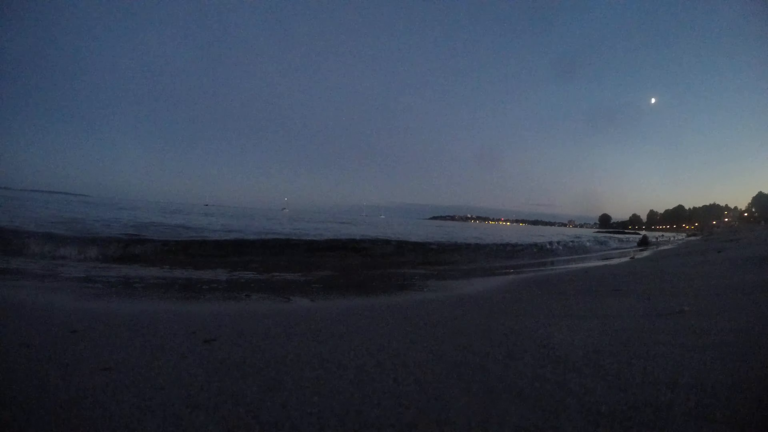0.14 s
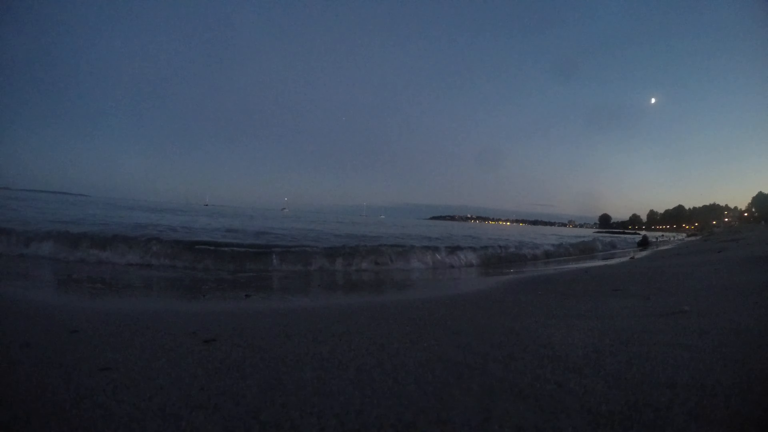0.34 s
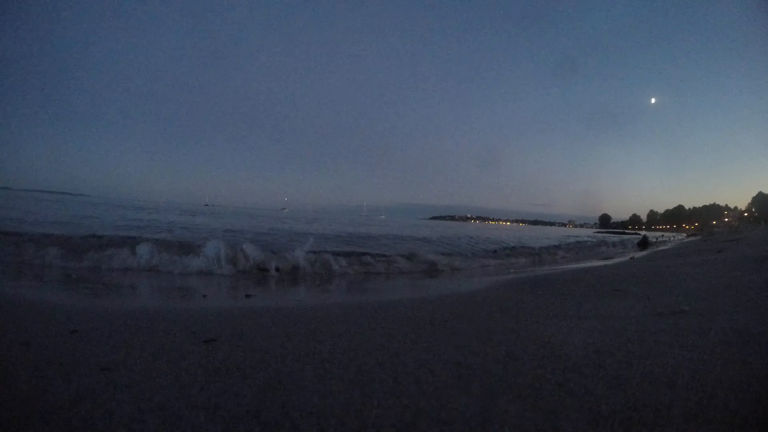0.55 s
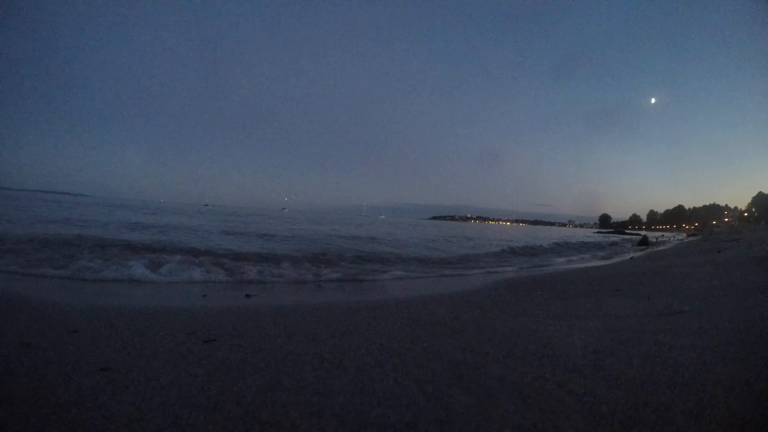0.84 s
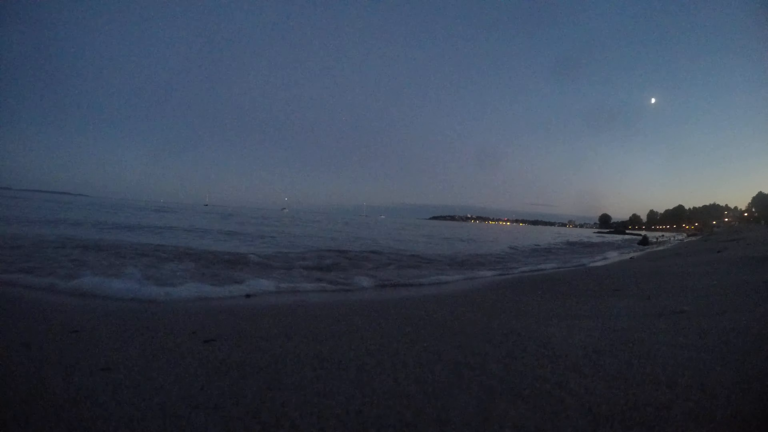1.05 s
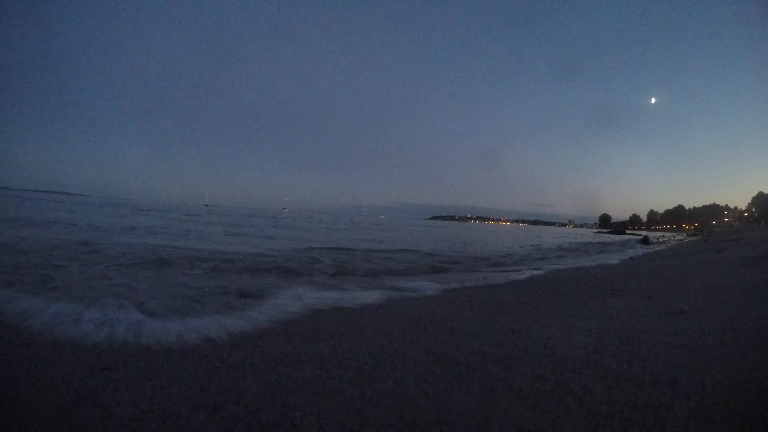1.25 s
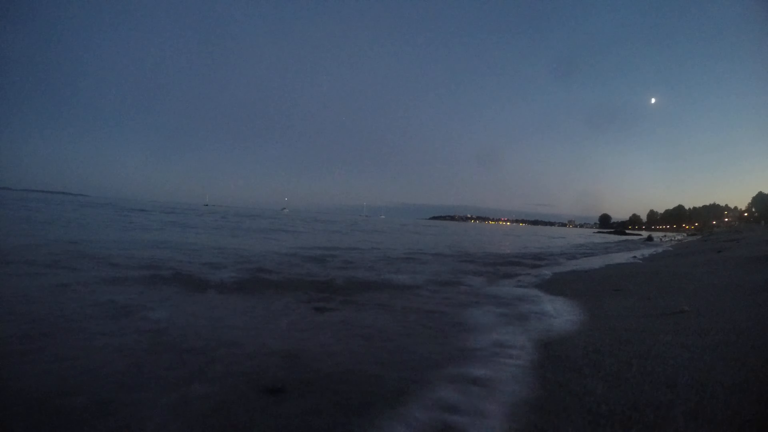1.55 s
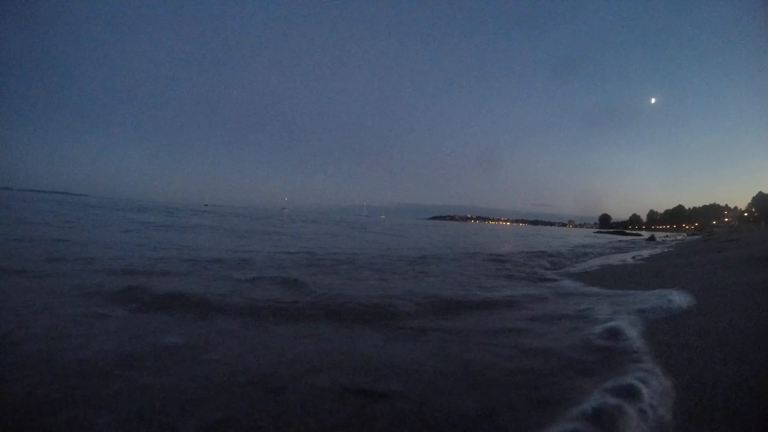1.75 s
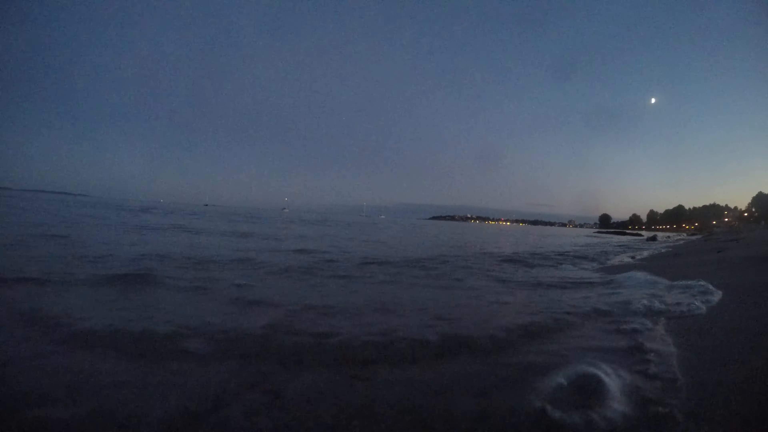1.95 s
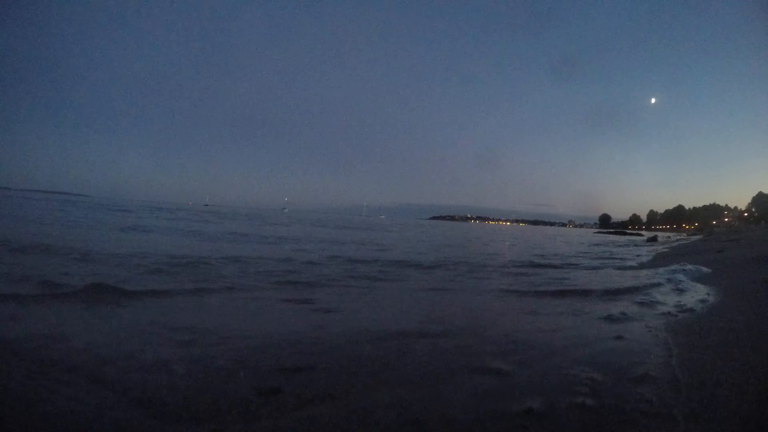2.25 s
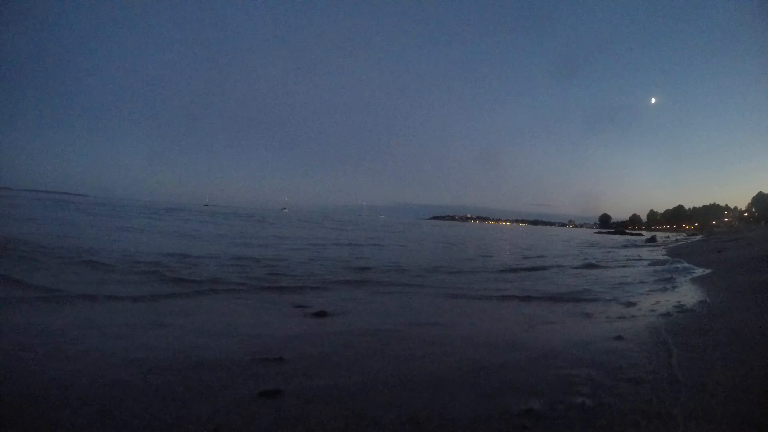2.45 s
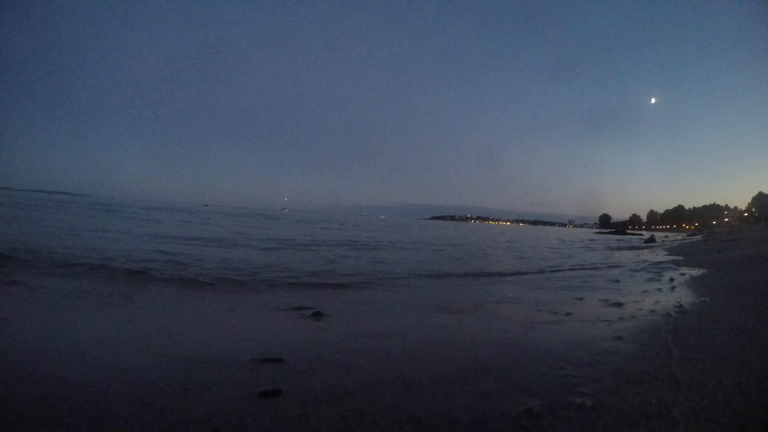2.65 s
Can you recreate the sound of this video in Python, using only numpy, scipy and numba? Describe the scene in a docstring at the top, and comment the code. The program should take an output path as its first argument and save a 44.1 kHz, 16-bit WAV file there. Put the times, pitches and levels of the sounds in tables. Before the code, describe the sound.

Small sea wave spilling with hollow gulps, then bubbling foam running up close over sand

```python
"""A sandy beach on a still night: a small wave spills over, collapses on trapped air and runs up the sand.
Clouds of ringing bubbles, each a decaying sine, make the break, the fizzing swash and the trickling backwash.
Single drops and bursting bubbles sound close by as short clicks and chirps; trapped air booms as gliding sines.
Filtered noise gives a low rumble of air on the microphone and the faint hiss of a calm sea."""
import sys
import numpy as np
from scipy import signal
from scipy.fft import rfft, irfft, next_fast_len
from scipy.io import wavfile
from scipy.ndimage import uniform_filter1d
from numba import njit

SR = 44100
rng = np.random.default_rng(int(sys.argv[2]) if len(sys.argv) > 2 else 0)


def digitize_waveform(pressure):
    """Quantize a signal to 16-bit integers and store it at the path in sys.argv[1].

    Rows of a 2-D input are taken as channels; values are limited to [-1, 1].
    """
    field = np.atleast_2d(pressure).T
    bounded = np.clip(field, -1, 1)
    quanta = np.round(bounded * 32767).astype(np.int16)
    wavfile.write(sys.argv[1], SR, quanta)


N = 123921
T = np.arange(N) / SR


def undb(db):
    """Level definition: decibels to amplitude gain."""
    return 10 ** (np.asarray(db) / 20)


def curve(rows):
    """Level envelope: gain over time, interpolated in decibels between (time_s, level_db) points."""
    time_s, level_db = np.array(rows).T
    return undb(np.interp(T, time_s, level_db))


def colour(x, points):
    """Minimum-phase filtering: a causal filter through (frequency_hz, density_db) points, output rms 1."""
    hz, db = np.array(points).T
    size = next_fast_len(2 * N)
    f = np.maximum(np.arange(size // 2 + 1) * SR / size, 1)
    # beyond the end points the response falls 20 dB per octave
    octaves_below = np.maximum(np.log2(hz[0] / f), 0)
    octaves_above = np.maximum(np.log2(f / hz[-1]), 0)
    response_db = np.interp(np.log(f), np.log(hz), db) - 20 * (octaves_below + octaves_above)
    # folding the cepstrum onto positive time makes the filter causal
    cepstrum = irfft(np.log(undb(response_db)), size)
    cepstrum[1:size // 2] *= 2
    cepstrum[size // 2 + 1:] = 0
    y = irfft(rfft(x, size) * np.exp(rfft(cepstrum)), size)[:N]
    return y / y.std()


def walk(rate):
    """Band-limited fluctuation: random steps, rate per second, smoothed twice; spread near 1."""
    hold = max(int(SR / rate), 2)
    steps = np.repeat(rng.standard_normal(N // hold + 1), hold)
    return 1.3 * uniform_filter1d(uniform_filter1d(steps, hold), hold)[:N]


def burst(start, swell, decay):
    """Transient envelope: a smooth sine-squared swell, then exponential decay (all in s)."""
    age = np.maximum(T - start, 0)
    rise = np.sin(np.pi / 2 * np.minimum(age / swell, 1)) ** 2
    return rise * np.exp(-np.maximum(age - swell, 0) / decay)


def bubble(start, hz, swell, decay, glide):
    """Volume resonance: one body of air rings while its pitch slides (glide in octaves per s)."""
    age = np.maximum(T - start, 0)
    pitch = hz * 2 ** (glide * np.minimum(age, swell + 2 * decay))
    return burst(start, swell, decay) * np.sin(2 * np.pi * np.cumsum(pitch * (age > 0)) / SR)


@njit
def ring(starts, hz, cycles, sizes, rise):
    """Superposition of damped oscillators: small bubbles, each a fading sine that rises in pitch."""
    out = np.zeros(N)
    for k in range(len(starts)):
        length, first, phase = cycles[k] * SR / hz[k], int(starts[k]), 0.
        for i in range(min(int(length), N - first)):
            u = i / length
            phase += 2 * np.pi * hz[k] * (1 + rise * u) / SR
            out[first + i] += sizes[k] * np.exp(-5 * u) * np.sin(phase)
    return out


def cloud(points, lo_hz, hi_hz, cycles, spread_db, rise, blur, count):
    """Random superposition: bubbles of many sizes over the noise blur of those too small to tell apart."""
    when, pitch, life, size = rng.random((count, 4)).T
    hz = lo_hz * (hi_hz / lo_hz) ** pitch
    sizes = hz * undb(-spread_db * np.log(1 - .985 * size))
    lives = cycles * 2 ** (2 * life - 1)  # half to twice the given cycles
    grains = ring(when * N, hz, lives, sizes, float(rise))
    return colour(grains / grains.std() + blur * rng.standard_normal(N), points)


# spectrum of the calm sea: frequency_hz, density_db (per Hz)
SEA_SPECTRUM = [(200, 3), (800, 4), (1100, 3), (2400, -12), (3300, -1.5), (5000, -8.5), (8000, -4.5),
                (13000, -9.5), (15500, -13)]
SEA_DB = -67


def sea():
    """Broadband noise: the faint, slowly wavering hiss of the calm water along the shore."""
    hiss = colour(rng.standard_normal(N), SEA_SPECTRUM)
    return undb(SEA_DB + .5 * walk(4.6)) * hiss


# spectrum of air on the microphone: frequency_hz, density_db (per Hz)
RUMBLE_SPECTRUM = [(15, -2), (28, -5), (45, 2.5), (70, -3), (105, -6), (135, -13.5), (190, -17), (260, -17),
                   (340, -24), (1000, -43), (4000, -85)]
RUMBLE_DB = -49.5


def rumble():
    """Low-frequency noise: air rumbles steadily on the microphone."""
    return undb(RUMBLE_DB) * colour(rng.standard_normal(N), RUMBLE_SPECTRUM)


# spectrum of big bubbles, also of the thump's slosh: frequency_hz, density_db (per Hz)
CHURN_SPECTRUM = [(50, -18), (90, -6), (170, -4), (280, -7), (380, -9), (520, -16.5), (800, -18)]
THUMP_S, THUMP_HZ, THUMP_WIDTH_S = 1.985, 63.5, 0.0024
THUMP_DB, THUMP_SLOSH_DB = -30.5, -52


def thump():
    """Impulsive displacement: one dull pulse with a sloshing noise tail as the water arrives."""
    age = T - THUMP_S
    pulse = -np.cos(2 * np.pi * THUMP_HZ * age) / np.cosh(age / THUMP_WIDTH_S)
    slosh_envelope = burst(THUMP_S - THUMP_WIDTH_S, THUMP_WIDTH_S, 0.02)
    slosh = colour(rng.standard_normal(N), CHURN_SPECTRUM) * slosh_envelope
    return undb(THUMP_DB) * pulse + undb(THUMP_SLOSH_DB) * slosh


# spectrum of a dry tick: frequency_hz, density_db (per Hz)
TICK_SPECTRUM = [(1200, -6), (2200, -2.5), (4200, 2.5), (6500, -8), (15000, -22.5)]
DROP_SWELL_S, TICK_DECAY_S = 0.00055, 0.002
TICK_SCATTER_OCT, SPLATTER_DB = 0.1, -11.5  # pitch scatter of the snap; splatter rms re snap peak


def ticks(starts, levels_db):
    """Impulse response: each tick is a snap, higher or lower with bubble size, and its wet splatter."""
    snap = colour(signal.unit_impulse(N), TICK_SPECTRUM)
    snap = snap / np.abs(snap).max()
    splatter = undb(SPLATTER_DB) * colour(rng.standard_normal(N), TICK_SPECTRUM)
    out = np.zeros(N)
    for start, db in zip(starts, levels_db):
        age = (T - start) * 2 ** (TICK_SCATTER_OCT * rng.standard_normal())
        tick = np.interp(age, T, snap, left=0) + splatter * burst(start, DROP_SWELL_S, TICK_DECAY_S)
        out += undb(db) * tick
    return out


# foam bubbles that burst: start_s, level_db (peak of the snap)
POP_EVENTS = [(1.4104, -40.5), (1.5417, -37), (1.5604, -38), (1.6852, -44), (1.7162, -41), (1.7265, -42),
              (1.7499, -39), (1.7593, -37), (1.764, -40), (1.7953, -41), (1.826, -38), (1.8281, -40.5),
              (1.9163, -40), (1.9485, -37.5), (2.139, -39.5), (2.226, -47.5), (2.308, -41.5), (2.3367, -46),
              (2.3485, -43.5), (2.3733, -45), (2.38, -45.5), (2.3963, -47.5), (2.5061, -43)]


def pops():
    """Sudden pressure release: foam bubbles burst with a dry tick."""
    start_s, level_db = np.array(POP_EVENTS).T
    return ticks(start_s, level_db)


# near drops that leave a ringing bubble: start_s, pitch_hz (at the start), level_db (of the ringing), decay_s
DROP_EVENTS = [(.292, 2690, -38, 0.0028), (.623, 10000, -43.5, .001), (.6677, 2580, -33.5, 0.0031),
               (.7285, 12200, -50, 0.00092), (1.3547, 1220, -40, 0.0015), (1.356, 2540, -42, 0.0025),
               (1.4102, 2280, -46, 0.0026), (1.428, 4700, -44.5, .0015), (1.534, 5860, -36.5, 0.0012),
               (1.534, 2300, -39.5, 0.0033), (1.5615, 4340, -30.5, 0.0013), (1.5722, 5600, -42, .0007),
               (1.657, 2250, -39, 0.0016), (1.683, 2800, -42.5, 0.0021), (2.0108, 3700, -38, 0.00045),
               (2.078, 2230, -45, 0.0051), (2.1353, 2940, -43, 0.00084)]
DROP_GLIDE, DROP_TICK_DB = 4.7, -8  # octaves per s; tick re ringing bubble


def drops():
    """Impact and resonance: near drops tick and leave a bubble that rings upward in pitch."""
    ringing = sum(undb(db) * bubble(start, hz, DROP_SWELL_S, decay, DROP_GLIDE)
                  for start, hz, db, decay in DROP_EVENTS)
    start_s, _, level_db, _ = np.array(DROP_EVENTS).T
    return ringing + ticks(start_s, level_db + DROP_TICK_DB)


# spray from the crest and the foam front: start_s, level_db, swell_s, decay_s
SPRAY_EVENTS = [(.33, -51, 0.058, 0.046), (.349, -47, .003, 0.009), (1.520, -43.5, 0.0083, 0.018),
                (1.556, -43.5, 0.0042, 0.0033)]
# spectrum of the spray: frequency_hz, density_db (per Hz)
SPRAY_SPECTRUM = [(900, -25), (1700, -3), (2300, 3), (3200, -1), (4400, 6.5), (6100, 1), (7500, -3),
                  (9800, -8.5), (15500, -17)]


def spray():
    """Gated bubble cloud: crest and foam front throw up brief, bright spray."""
    droplets = cloud(SPRAY_SPECTRUM, 1560, 10100, cycles=8, spread_db=3.5, rise=0.095, blur=0.16, count=14000)
    return droplets * sum(undb(db) * burst(start, swell, decay) for start, db, swell, decay in SPRAY_EVENTS)


# fine droplets pattering down: time_s, level_db
PATTER_LEVEL = [(0, -91), (.3, -59.5), (.7, -70.5), (1.1, -73), (1.45, -71), (1.78, -60.5), (2.0, -65),
                (2.2, -71), (2.8, -74)]
# their spectrum: frequency_hz, density_db (per Hz)
PATTER_SPECTRUM = [(1500, -15), (2400, 8), (3300, 2.5), (4600, 2), (7500, -2.5), (10200, -3), (13000, -5.5),
                   (15500, -14)]


def patter():
    """Random short resonances: fine droplets patter down at fixed pitches."""
    droplets = cloud(PATTER_SPECTRUM, 3100, 16200, cycles=5, spread_db=2.7, rise=0, blur=0.4, count=1100)
    return droplets * curve(PATTER_LEVEL)


# foam front running up the sand, and water gurgling and draining, before flutter: time_s, level_db
FIZZ_LEVEL = [(0, -84), (.8, -67), (1.15, -66.5), (1.42, -61), (1.52, -55), (1.62, -56.5), (1.8, -58),
              (1.95, -57), (2.06, -65), (2.35, -71), (2.8, -72)]
GURGLE_LEVEL = [(0, -79), (.8, -59), (1.4, -66), (1.76, -59.5), (1.94, -55), (2.07, -61), (2.2, -63.5),
                (2.42, -64), (2.6, -70), (2.8, -68)]
# spectra of both: frequency_hz, density_db (per Hz)
FIZZ_SPECTRUM = [(500, -24), (1050, -9.5), (1400, 0.5), (2300, 1), (2800, -3.5), (3250, -10.5), (3900, -1),
                 (4650, 4), (5500, -4), (6200, -3.5), (7500, -10.5), (15500, -21)]
GURGLE_SPECTRUM = [(150, 5.5), (280, -1), (500, -1.5), (800, 0), (1050, -3), (1400, -3.5), (2200, -0.5),
                   (3300, -14), (6000, -37)]
FLUTTER_DB = .8


def swash():
    """Bubble size sets pitch: foam fizzes up the sand, the sheet of water behind gurgles and drains."""
    fizz = cloud(FIZZ_SPECTRUM, 936, 14200, cycles=13, spread_db=2.5, rise=0.088, blur=.2, count=7000)
    gurgle = cloud(GURGLE_SPECTRUM, 252, 3930, cycles=7.7, spread_db=3, rise=0.3, blur=0.17, count=2800)
    flutter = undb(FLUTTER_DB * walk(54.8))  # shared by both
    return (fizz * curve(FIZZ_LEVEL) + gurgle * curve(GURGLE_LEVEL)) * flutter


# pockets of air trapped by the curl, before tearing:
# start_s, pitch_hz (at the start), level_db, swell_s, decay_s, glide_octaves_per_s
POCKET_EVENTS = [(.236, 253.3, -48, 0.012, 0.042, 1.5), (.347, 351, -36.5, 0.007, 0.0096, -8),
                 (0.364, 234, -38.5, 0.011, 0.0093, 1), (0.388, 130, -39.5, 0.022, 0.015, 6.5),
                 (.428, 172, -39, 0.0065, 0.032, 2), (.487, 241, -38.5, 0.015, .02, 5.5),
                 (.578, 171, -40.5, 0.019, 0.016, 1), (.588, 270, -41, .018, 0.013, 2),
                 (0.613, 234.8, -26, 0.022, 0.011, 5), (0.672, 84, -40.5, 0.016, 0.035, 3.5)]
POCKET_TEAR_DB = 1.3


def pockets():
    """Resonance of trapped air: large pockets boom with gliding pitch and a torn, flickering level."""
    boom = sum(undb(db) * bubble(start, hz, swell, decay, glide)
               for start, hz, db, swell, decay, glide in POCKET_EVENTS)
    return boom * undb(POCKET_TEAR_DB * walk(150))


# spectrum of the lip landing: frequency_hz, density_db (per Hz)
PLUNGE_SPECTRUM = [(200, -8), (320, 2.5), (520, -1.5), (820, 4), (1030, -12.5), (1250, -16), (2000, -14)]
PLUNGE_S, PLUNGE_SWELL_S, PLUNGE_DECAY_S, PLUNGE_DB = 0.464, 0.22, 0.035, -46.5


def plunge():
    """Gated bubble cloud: the lip lands in a swell of mid-sized bubbles and dies quickly."""
    bubbles = cloud(PLUNGE_SPECTRUM, 256, 2000, cycles=6.9, spread_db=-1.5, rise=.15, blur=0.32, count=5000)
    return bubbles * undb(PLUNGE_DB) * burst(PLUNGE_S, PLUNGE_SWELL_S, PLUNGE_DECAY_S)


# big bubbles churning under the crest: time_s, level_db
CHURN_LEVEL = [(0, -102), (.33, -65), (.39, -46.5), (.5, -46.5), (.64, -44.5), (.72, -50.5), (.8, -53),
               (1, -67), (2.8, -82)]


def churn():
    """Low resonance of large volumes: big bubbles churn under the crest."""
    bubbles = cloud(CHURN_SPECTRUM, 72, 820, cycles=8, spread_db=1.5, rise=0.24, blur=.25, count=1500)
    return bubbles * curve(CHURN_LEVEL)


# breaking crest and the foam it leaves, before graininess: time_s, level_db
RUSH_LEVEL = [(0, -67.5), (.1, -64), (.22, -54.5), (.32, -51), (.36, -46), (.46, -46.5), (.58, -45),
              (.67, -46.5), (.76, -53), (.95, -56.5), (1.3, -61), (2.8, -70)]
# its spectrum: frequency_hz, density_db (per Hz)
RUSH_SPECTRUM = [(280, -17), (420, -3.5), (830, -3.5), (1030, -11.5), (1190, -2.5), (1400, -6.5),
                 (2050, -1), (2650, -1.5), (3000, -5), (3400, -12.5), (4200, -8), (4700, -6), (5400, -7.5),
                 (7100, -14), (7910, -21.5), (10200, -20.5), (11800, -27), (12900, -21), (15500, -35)]
RUSH_GRAIN_DB = 1.0


def breaker():
    """Dense superposition: bubbles of the spilling crest merge into a grainy rush."""
    rush = cloud(RUSH_SPECTRUM, 583, 16800, cycles=9.7, spread_db=2.5, rise=0.22, blur=0.46, count=30000)
    return rush * curve(RUSH_LEVEL) * undb(RUSH_GRAIN_DB * walk(130))


def scene():
    """Linear superposition: the night, the run up the sand and the breaking wave add up."""
    background = sea() + rumble() + thump()
    close_by = pops() + drops() + spray()
    run_up = patter() + swash()
    wave = pockets() + plunge() + churn() + breaker()
    return (background + close_by + run_up + wave)[None]


TOP_HZ = 15350


def record(dry):
    """Elliptic low-pass filtering: the recorder cuts the top."""
    return signal.sosfilt(signal.ellip(10, .2, 70, TOP_HZ, fs=SR, output="sos"), dry)


dry = scene()
out = record(dry)
digitize_waveform(out)
```